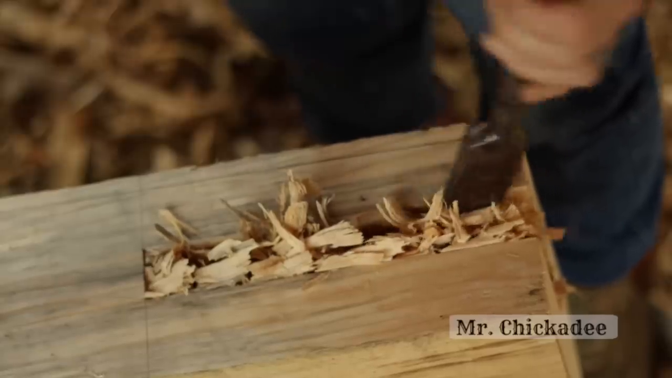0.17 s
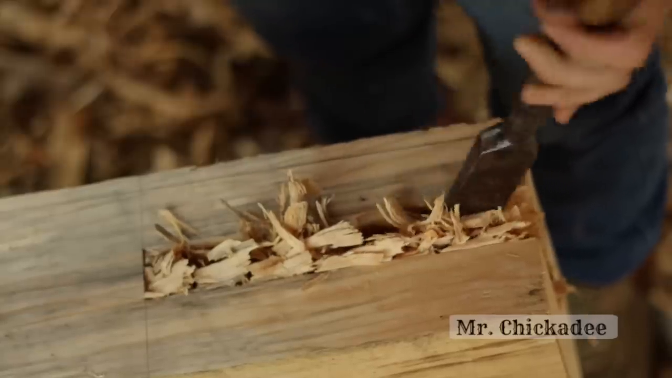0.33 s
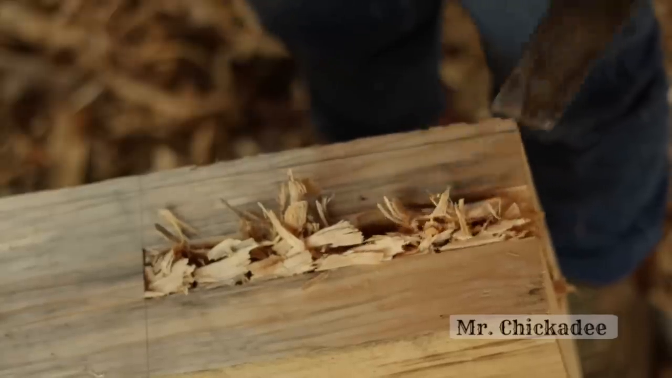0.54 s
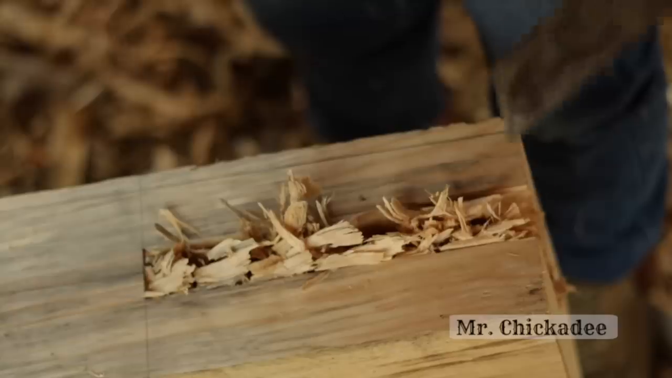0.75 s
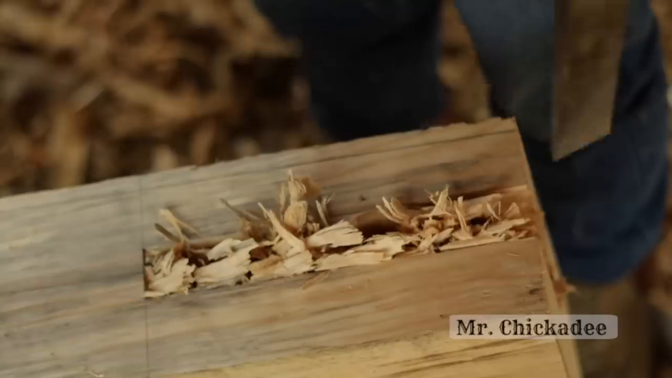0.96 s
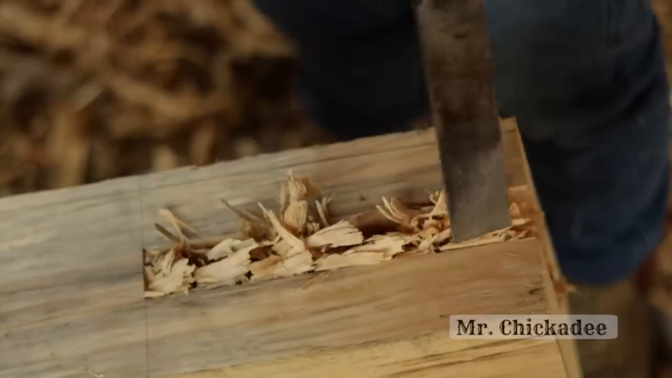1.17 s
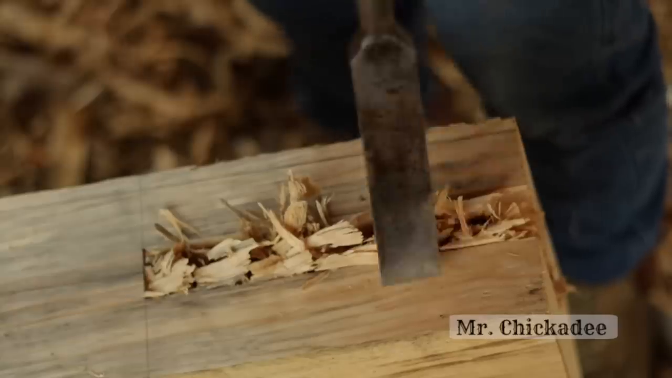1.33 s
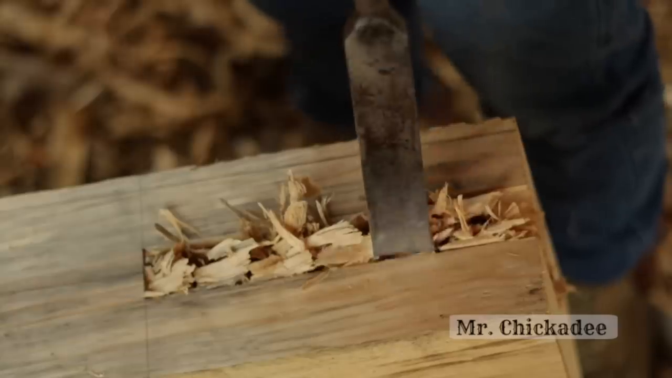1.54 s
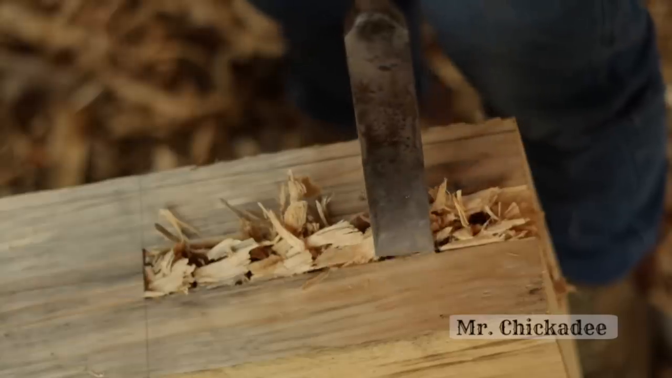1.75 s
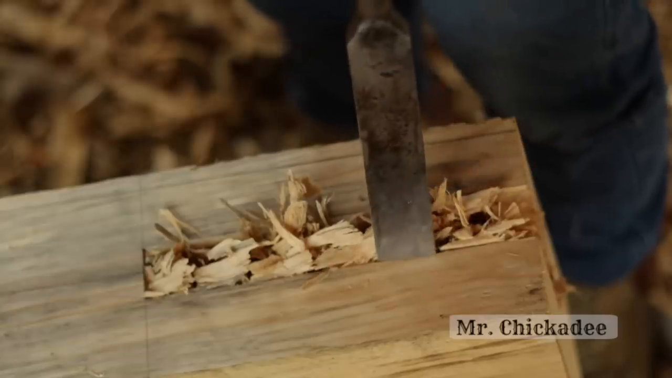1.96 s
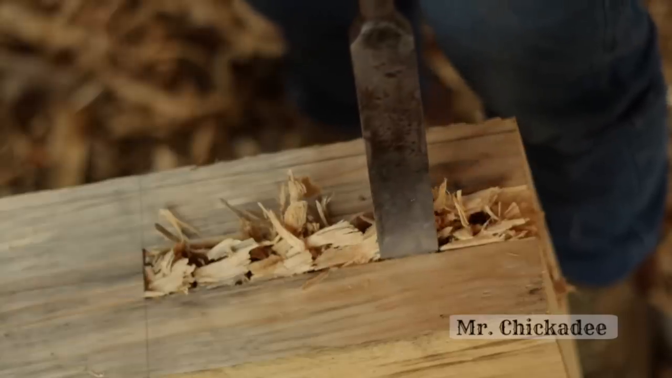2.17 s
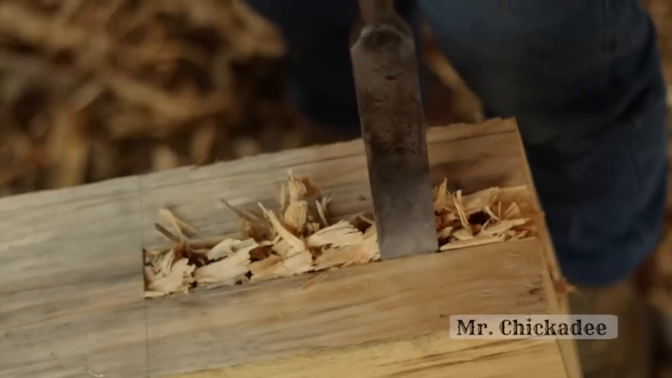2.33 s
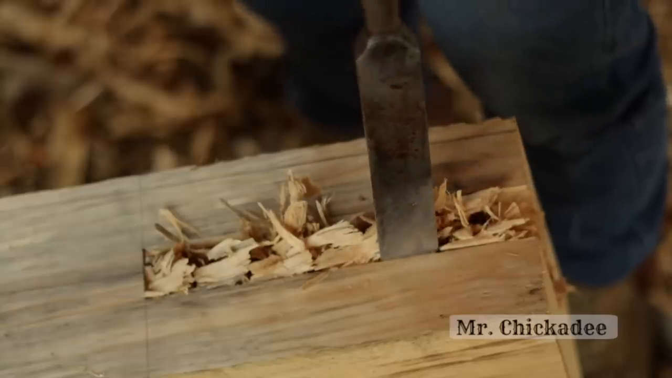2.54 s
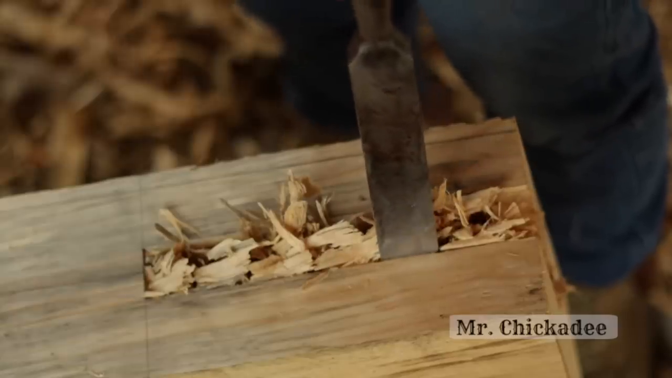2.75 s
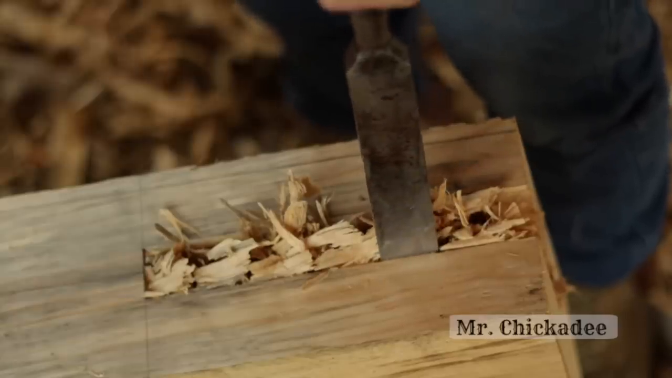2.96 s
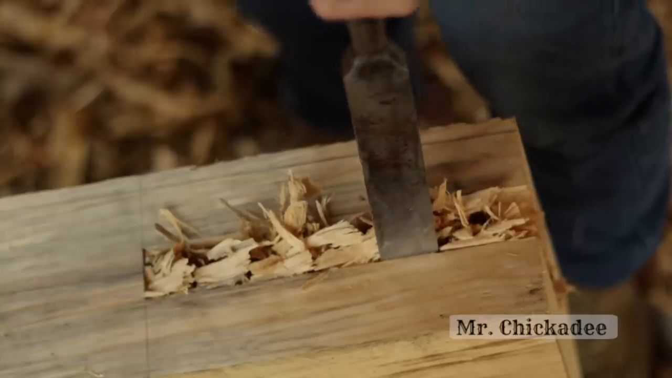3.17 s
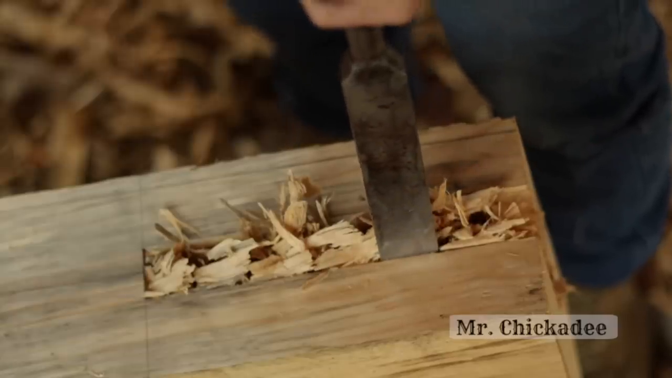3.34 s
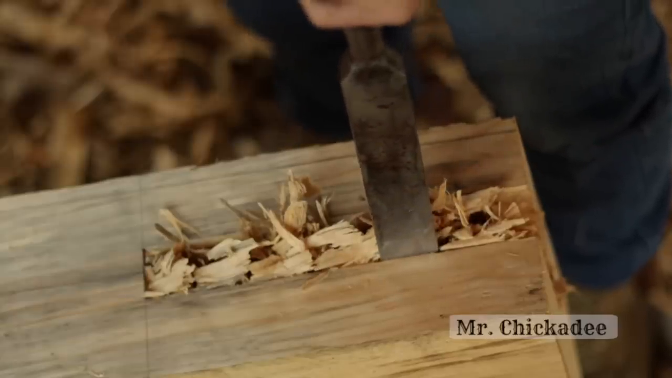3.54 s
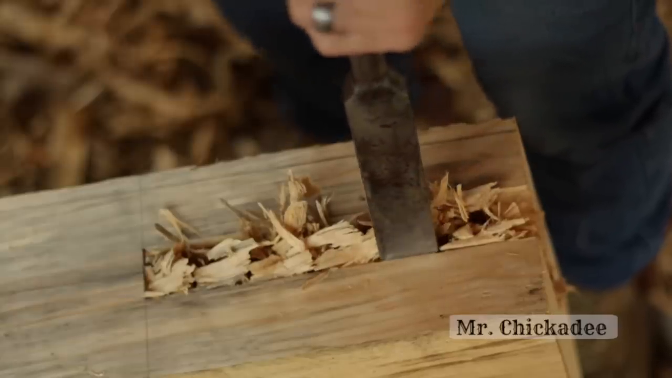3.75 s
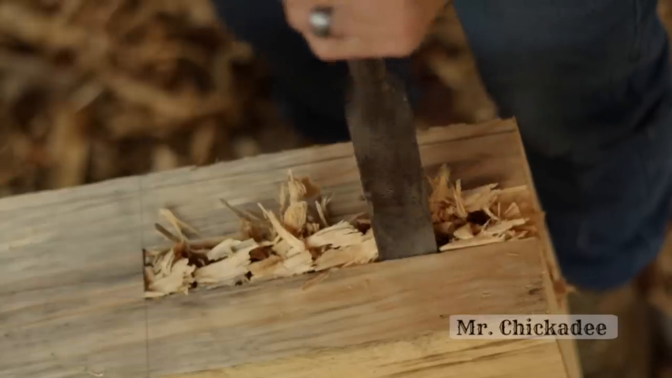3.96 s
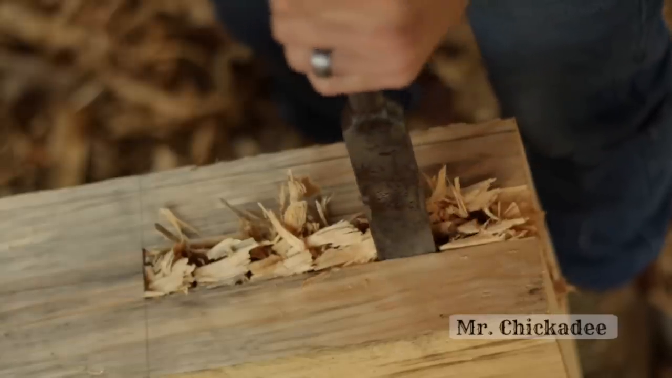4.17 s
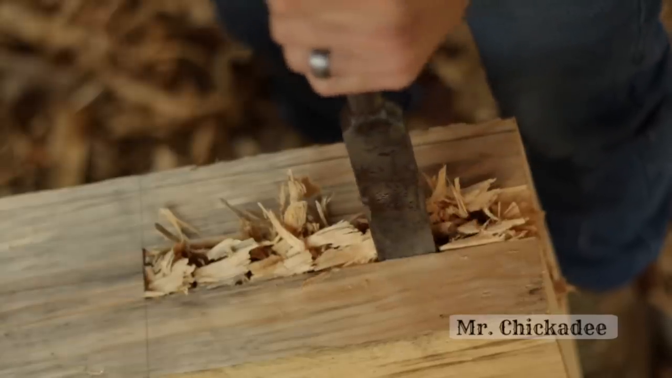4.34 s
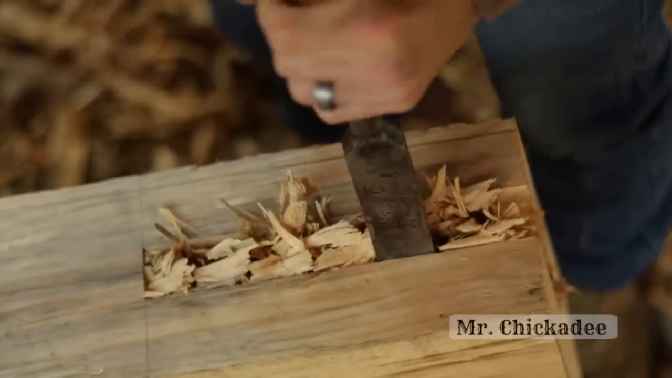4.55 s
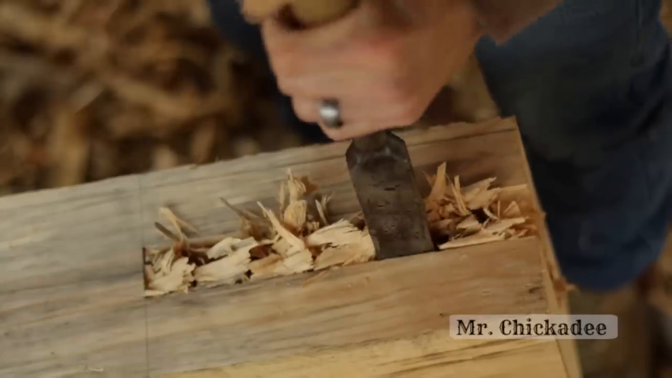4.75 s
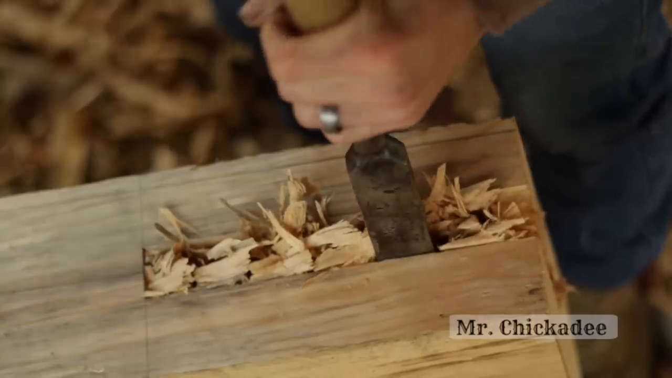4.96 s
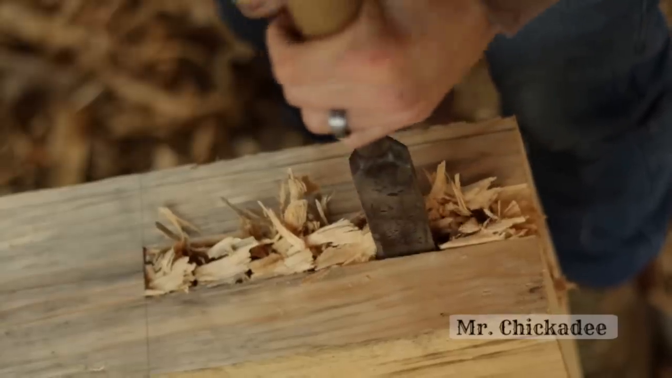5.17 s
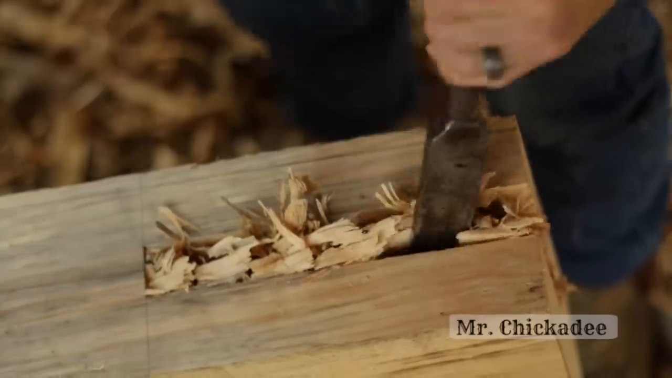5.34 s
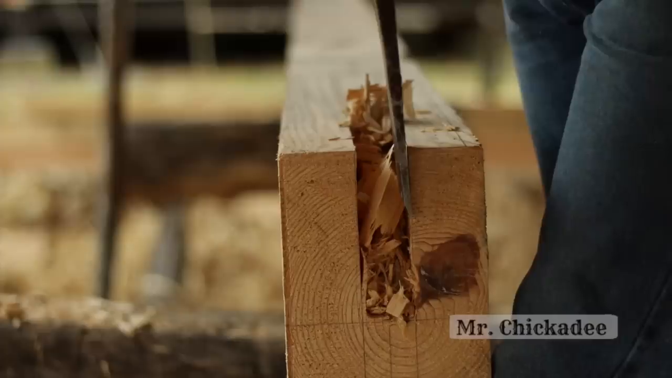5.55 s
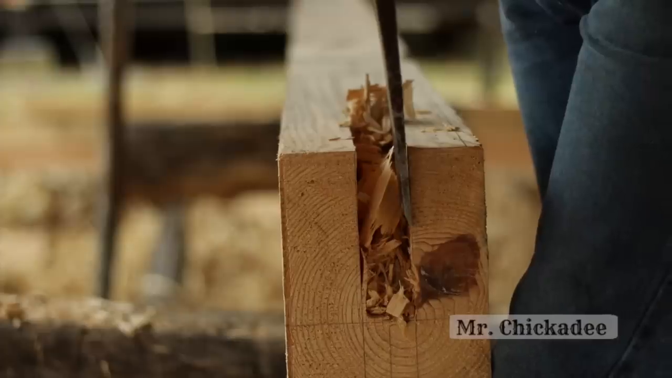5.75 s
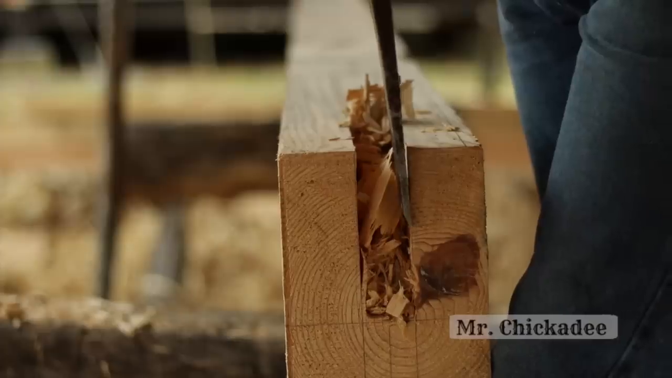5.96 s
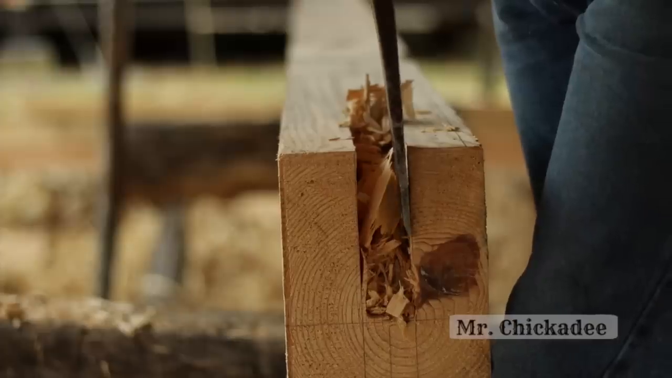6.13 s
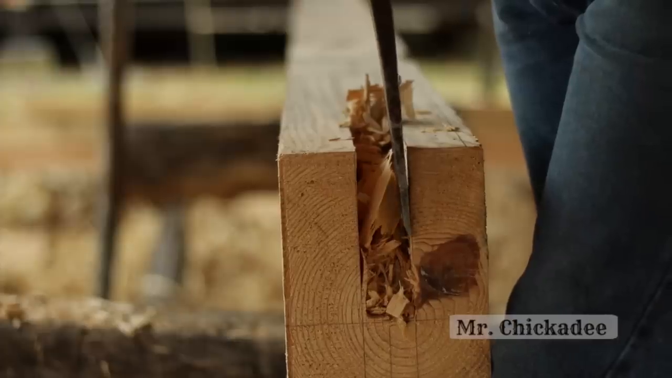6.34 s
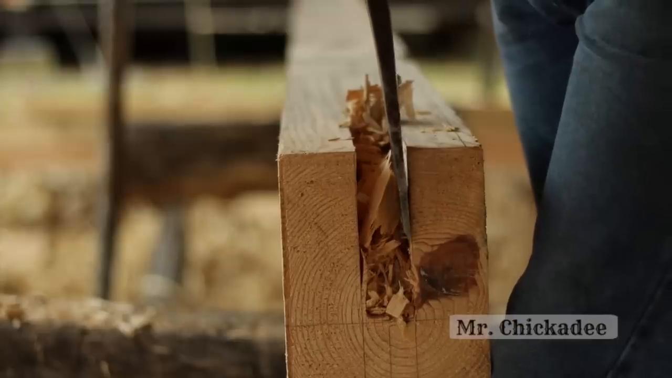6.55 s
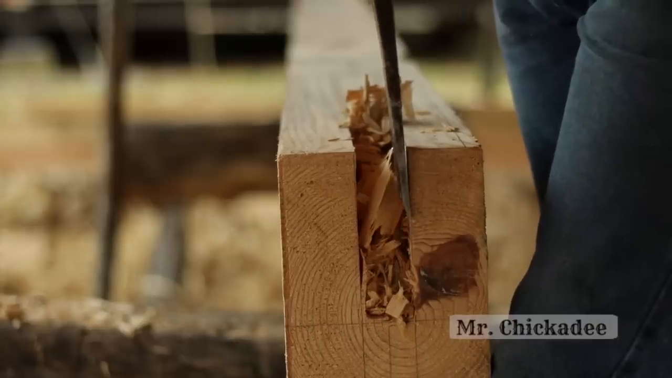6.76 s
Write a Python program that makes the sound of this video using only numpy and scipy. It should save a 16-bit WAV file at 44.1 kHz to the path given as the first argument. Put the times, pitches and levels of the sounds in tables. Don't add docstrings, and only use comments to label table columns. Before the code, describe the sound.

Close stereo pickup above a timber beam. The tail of a blow fades over faint hiss; a blade slides, rustles chips, cracks fibres and rings lightly, then is set down with soft thuds. Five sharp mallet strikes knock and ring the beam, with quick shed echo and a slower yard return. The perspective shifts to the beam's end for three fuller strikes whose echo hangs on along the wood.

```python
import sys
import numpy as np
from scipy import signal
from scipy.io import wavfile
from scipy.ndimage import minimum_filter1d

SR = 44100
rng = np.random.default_rng(int(sys.argv[2]) if len(sys.argv) > 2 else 0)


def int16_out(signal):
    q = np.round(np.clip(np.atleast_2d(signal).T, -1, 1) * 32767)
    wavfile.write(sys.argv[1], SR, q.astype(np.int16))


def undo_db(level):
    steps = np.asarray(level, float) / 20
    return 10 ** steps


N = 299880
CHANGE_S = 5.545
DELAY_S = .0018


def at_hz(points, hz, column=1):
    points = np.array(points)
    return np.interp(np.log(hz), np.log(points[:, 0]), points[:, column])


def clicks(times, sizes):
    out = np.full(N, 1e-18)
    np.add.at(out, ((np.asarray(times) + DELAY_S) * SR).astype(int), sizes)
    return out


def fall(t, t60):
    return undo_db(-60 * t / t60)


def dying(x, t60):
    return signal.lfilter([1], [1, -fall(1 / SR, t60)], x)


def ring(x, hz, t60):
    r, w = fall(1 / SR, t60), 2 * np.pi * hz / SR
    return signal.lfilter([0, np.sin(w)], [1, -2 * r * np.cos(w), r * r], x)


def modes(x, table):
    return sum((-1) ** k * undo_db(db) * ring(x, hz, t60) for k, (hz, db, t60) in enumerate(table))


def band(x, low_hz, high_hz):
    sos = signal.butter(2, [low_hz, min(high_hz, .45 * SR)], "band", fs=SR, output="sos")
    return signal.sosfilt(sos, x)


def noise_bank(alike_table, gain_at):
    out = 0
    edges = 22 * 2 ** np.arange(0, 10, .5)
    white = rng.standard_normal((2, 2, N))
    for k, (low, high) in enumerate(zip(edges, edges[1:])):
        mid, side = band(white[k % 2], low, high)
        hz = np.sqrt(low * high)
        alike = np.clip(at_hz(alike_table, hz), -1, 1)
        stereo = np.sqrt(1 + alike) * mid + np.sqrt(1 - alike) * side * [[1], [-1]]
        out = out + gain_at(hz) * stereo
    return out


def panned(x, pan_db, lag_samples):
    late = np.interp(np.arange(N) - lag_samples, np.arange(N), x)
    return np.array([late, x]) * undo_db(np.array([[.5], [-.5]]) * pan_db)


# (frequency [Hz], density [dB per Hz])
HISS = [(15, -33.5), (80, -3.5), (190, -12), (300, -9), (1100, -13.5), (9580, -24), (15200, -30),
        (16500, -46)]
# (frequency [Hz], left-right likeness [0-1])
HISS_ALIKE = [(60, 1), (240, 0.072), (950, 0.16), (3770, 0.29), (15000, 0.042)]
# (frequency [Hz], rise [dB])
END_AIR = [(60, 7), (300, 5.5), (1000, 2.5), (4000, 4), (14000, 5.5)]


def hiss():
    moved = np.arange(N) >= CHANGE_S * SR
    air = noise_bank(HISS_ALIKE, lambda hz: undo_db(at_hz(HISS, hz) + moved * at_hz(END_AIR, hz)))
    return undo_db(-64.5) * air / air[:, :int(CHANGE_S * SR)].std()


# (time [s], peak [dB], thud [dB], bite [dB], beam ring [dB])
FIRST_BLOW = [
    (-0.0065, 0.74, 3.5, 4, -20),
]
NEAR_BLOWS = [
    (3.6729, -2, 7, -12, -28),
    (4.0304, -0.5, -29, -16.5, -25),
    (4.4058, -1, -28, -23, -31),
    (4.7768, 0.5, -11.5, -12.5, -27.5),
    (5.1397, -1, -21, -17.5, -24),
]
END_BLOWS = [
    (5.7657, -2.5, -13.5, -24, -16),
    (6.1463, 0.5, -16, -5.5, -24.5),
    (6.4863, 1, -23.5, -11, -21),
]
# (frequency [Hz], width [Hz], level [dB])
NEAR_KNOCK = [(410, 150, -8), (816, 89, 5.5), (825, 250, 8.5), (1350, 135, -5), (1656, 67, 2),
              (1760, 270, -4), (2544, 220, 15), (2870, 130, -11), (3940, 84, 2), (4370, 150, 5),
              (6410, 630, 12), (7850, 220, -3)]
END_KNOCK = [(530, 160, -10.5), (780, 200, -35), (1024, 150, 29.5), (1255, 89, 2), (1704, 200, 21),
             (2270, 460, 6.5), (2860, 690, 6), (3040, 160, -0.5), (4240, 130, -1), (6750, 800, 9.5),
             (7650, 200, 6)]
# (frequency [Hz], level [dB], t60 [s])
NEAR_BEAM = [(213.5, -17, 0.28), (266, -16.5, 0.21), (377.6, -5, 0.27), (404, -4, 0.32), (543, -8.5, 0.21),
             (644, -6, 0.073), (732, -5.5, .08), (1027, -19, .06)]
END_BEAM = [(325, -5.5, 0.049), (546, -6.5, 0.1), (667, 1.5, 0.063), (738, -8, 0.17), (870, -8, 0.062),
            (1027, -3.5, 0.043)]
# (frequency [Hz], level [dB], t60 [s])
SEATED_BLADE = [(2870, 3, 0.023), (4680, -3, 0.023)]


def knocking(force, knock, thud_db, bite_db, crack_db):
    colour = [(1100, thud_db + 8.5), (1200, 0.027), (2150, 0.0046),
              (2300, bite_db + 26.5), (3600, bite_db + 1), (3900, crack_db + 18.0)]
    out = 0
    for (hz, width_hz, db), vary_db in zip(knock, rng.normal(0, 2.96, len(knock))):
        t60 = 2.76 / np.clip(0.7 * width_hz, 220, 900)
        out = out + undo_db(db + vary_db + at_hz(colour, hz)) * ring(force, hz, t60)
    return out / np.abs(out).max()


def blows(table, knock, beam, drive_db, edge_db, thump_db, rebound_db, blade_db, sweep_hz,
          shudder_s, crack_s, lag_samples, pan_db):
    out = np.zeros((2, N + SR))
    span = np.arange(SR // 2)
    t = span / SR
    for depth, (s, peak_db, thud_db, bite_db, ring_db) in enumerate(table):
        unseated = depth == 0
        crack_db = edge_db + 0.48 * bite_db
        noise = rng.standard_normal((4, len(span)))
        click = -1. * (span == 0)
        force = 0.39 * noise[0] * fall(t, shudder_s) + click
        body = knocking(force, knock, thud_db, bite_db, crack_db)
        sweep = 2 * np.pi * np.cumsum(1250 + sweep_hz * np.minimum(t / 0.002654, 1)) / SR
        body = body - 1.18 * np.sin(sweep) * fall(t, 0.0079)
        body = band(band(body / np.abs(body).max(), 300, 8000), 300, 8000)
        body += undo_db(rebound_db) * unseated * np.roll(body, int(.023 * SR))
        jostle = noise[1] * fall(t, 0.24)
        body += undo_db(ring_db) * band(modes(click + 0.028 * jostle, beam), 157, 12000)
        body += undo_db(thump_db - 4 * unseated) * fall(t, 0.0047)
        free_modes = SEATED_BLADE[:2 if unseated else 1]
        body += undo_db(blade_db - 1.4 * depth) * modes(noise[0] * fall(t, 0.39), free_modes)
        crack = undo_db(crack_db + 6.0) * band(noise[2:] * fall(t, crack_s), 3830, 8040)
        stereo = body + 1.35 * crack[0] + 0.48 * crack[1] * np.array([[1], [-1]])
        start = int(s * SR)
        out[:, start + span] += undo_db(peak_db + drive_db) * stereo
    left = panned(out[0, :N], pan_db, lag_samples)[0]
    right = panned(out[1, :N], pan_db, 0)[1]
    return np.array([left, right])


NEAR_SHED_DB, END_SHED_DB, FIRST_SHED_DB = 0.8, -0.4, -1.1
NEAR_YARD_DB, END_YARD_DB, FIRST_YARD_DB = -5, -0.2, -5.4


def echo_levels(table, shed_db, yard_db):
    s, peak_db = np.transpose(table)[:2]
    follow_db = 0.62 * peak_db
    return s, undo_db(follow_db + shed_db), undo_db(follow_db + yard_db + 1.03 * np.arange(len(s)))


def echo_trains(s, shed, yard):
    late_s = np.maximum(s + .001, 0)
    return np.array([clicks(late_s, shed ** 2), clicks(late_s, yard ** 2)])


def echo_power(trains, table, hz):
    power = 0
    for train, column in zip(trains, (1, 3)):
        t60 = at_hz(table, hz, column + 1)
        power = power + undo_db(2 * at_hz(table, hz, column)) * dying(train, .5 * t60)
    return power


# (frequency [Hz], early level [dB], early t60 [s], late level [dB], late t60 [s])
NEAR_ECHO = [(100, -65.5, 0.05, -48.5, 0.6), (260, -37.5, 0.53, -51.5, 1.43),
             (697, -20.5, 0.39, -36.5, 1.01), (1440, -20, 0.11, -35, 1.03), (2135, -8, 0.0433, -35, 0.83),
             (2970, -37, 0.09, -42, 0.91), (5540, -26, 0.064, -45.5, 0.64), (13100, -69.5, 0.036, -66, 0.6)]
END_ECHO = [(107, -73, 0.14, -50, 1.7), (258, -29.5, 0.3, -51, 1.3), (620, -17.5, 0.37, -47, 1.17),
            (1490, -23, 0.26, -49, 1.13), (3200, -52.5, 0.58, -60.5, 1.25), (6750, -104, 0.093, -66, 2.3),
            (13700, -77, 0.05, -77.5, 0.4)]
# (frequency [Hz], left-right likeness [0-1])
ECHO_ALIKE = [(100, 1), (1000, 0.41), (8000, 0.13)]


def echoes():
    near_side = np.arange(N) < CHANGE_S * SR
    near_trains = echo_trains(*echo_levels(FIRST_BLOW, FIRST_SHED_DB, FIRST_YARD_DB))
    near_trains = near_trains + echo_trains(*echo_levels(NEAR_BLOWS, NEAR_SHED_DB, NEAR_YARD_DB))
    end_trains = echo_trains(*echo_levels(END_BLOWS, END_SHED_DB, END_YARD_DB))

    def envelope(hz):
        near = echo_power(near_trains, NEAR_ECHO, hz)
        end = echo_power(end_trains, END_ECHO, hz)
        power = signal.lfilter([.012], [1, -.988], near * near_side + end)
        return undo_db(9.5) * np.sqrt(power)
    return noise_bank(ECHO_ALIKE, envelope)


# (frequency [Hz], level [dB], t60 [s])
BLADE_LOW = [(1560, 0.0085, 0.13)]
BLADE_MAIN = [(2718, 3.5, 0.025), (2880, 0, 0.027)]
BLADE_HIGH = [(3190, -4, 0.044), (3960, 2.5, 0.011), (4470, -5.5, 0.06), (4780, -2, 0.036),
              (6460, -13.5, 0.031), (7240, -10.5, 0.034), (8250, -4, 0.039)]
# (frequency [Hz], level [dB], t60 [s])
TAPPED_BEAM = [(131, -5.5, 0.04), (189, -3.5, 0.063), (284, -0.5, 0.081), (391.7, -2.5, 0.4),
               (404.8, -5.5, 0.25), (550, -5, 0.089), (747, -3.5, 0.052), (1120, -5.5, 0.0324)]
# (start [s], length [s], steel rasp [dB], chip rustle [dB], beam rumble [dB])
SLIDES = [(0.154, 0.085, -54, -51.5, -58), (0.217, 0.066, -77, -63, -59.5), (0.342, 0.091, -74, -62, -65),
          (0.446, 0.077, -54, -55, -52.5), (0.534, 0.034, -76, -73, -53.5),
          (0.849, 0.065, -56.5, -56.5, -75), (0.918, 0.034, -43, -79, -79), (1.532, 0.048, -50.5, -59, -52),
          (1.579, 0.033, -43.5, -61, -51.5), (1.612, 0.037, -58, -53, -57), (2.025, 0.034, -68, -78, -58.5),
          (5.421, 0.1, -60, -59.5, -65), (5.505, 0.037, -70, -50.5, -57), (6.724, 0.026, -75, -56, -57.5)]


def slides():
    slips = undo_db(3.45 * np.minimum(rng.exponential(1, (3, N)), 5)) * rng.choice([-1, 1], (3, N))
    slips = slips * (rng.random((3, N)) < 5000 / SR)
    rasp = modes(slips[0], BLADE_MAIN) + 0.29 * modes(slips[0], BLADE_HIGH)
    rasp = rasp + 8 * band(slips[0], 1500, 3900)
    rustle = band(slips[1], 2000, 8600)
    rumble = 0.097 * modes(slips[2], TAPPED_BEAM) + 12 * band(slips[2], 590, 1500)
    layers = [x / x.std() for x in (rasp, rustle, rumble)]
    out, t = np.zeros(N), np.arange(N) / SR
    for start, length, *levels in SLIDES:
        s = start + length * np.array([0, 0.21, 0.72, 1])
        swell_db = np.interp(t, s, [-8, 0, 0, -8])
        fade = np.interp(t, [s[0] - .004, s[0], s[-1], s[-1] + .004], [0, 1, 1, 0])
        out += fade * sum(undo_db(db + swell_db) * x for db, x in zip(levels, layers))
    return panned(out, -0.28, 1.0)


# (time [s], peak [dB], pitch [Hz])
SNAPS = [(0.167, -33.5, 7840), (0.1835, -35, 3560), (0.2116, -27, 3000), (0.2179, -26, 4900),
         (0.2715, -38, 5460), (0.301, -43, 4760), (0.3274, -48, 4550), (0.341, -41, 5380),
         (0.364, -38, 8300), (0.3816, -40.5, 5300), (0.4875, -32.5, 4510), (0.5453, -38, 4010),
         (0.689, -38, 4200), (0.8411, -18, 4000), (1.6272, -26, 8400), (5.3654, -32.5, 4930),
         (5.439, -52, 4590), (5.4618, -37, 5010), (5.4772, -22, 3180), (5.526, -25.5, 3300),
         (6.2274, -29.5, 4120), (6.737, -30.5, 6700)]


def snaps():
    out = np.zeros(N)
    for s, peak_db, pitch_hz in SNAPS:
        burst = rng.standard_normal(300) * fall(np.arange(300) / SR, 0.0029)
        at = int((s + DELAY_S) * SR)
        out[at:at + 300] += undo_db(peak_db + 2.5) * band(burst, .6 * pitch_hz, 2.4 * pitch_hz)
    return panned(out, -1.3, 1.65)


# (time [s], low ring [dB], main ring [dB], high rings [dB], beam thud [dB])
TAPS = [
    (0.462, -53, -57, -62, -36.5),
    (0.546, -73, -74, -68, -32.5),
    (0.636, -47, -43, -63, -48.5),
    (0.795, -71, -60, -65, -81),
    (0.8411, -54, -20, -25, -64),
    (0.936, -56, -39.5, -43, -59),
    (1.501, -59, -41.5, -46, -29.5),
    (1.549, -57, -44, -53, -65),
    (1.932, -69, -49.5, -60, -37),
]


def taps():
    s, low_db, main_db, high_db, thud_db = np.transpose(TAPS)
    steel = modes(clicks(s, undo_db(low_db + 1.5)), BLADE_LOW)
    steel = steel + modes(clicks(s, undo_db(main_db + 1.5)), BLADE_MAIN)
    steel = steel + modes(clicks(s, undo_db(high_db - 1.0)), BLADE_HIGH)
    soft_contact = signal.lfilter([.15], [1, -.85], clicks(s, undo_db(thud_db - 10.0)))
    thud = modes(soft_contact, TAPPED_BEAM)
    return panned(band(steel, 1400, 24000), -7.5, 0.65) + panned(thud, 0.5, 0)


# (frequency [Hz], width [Hz], level [dB])
END_HOLLOW = [(690, 100, -40), (940, 100, -10.5), (1600, 100, -4), (2740, 150, -19.5)]


def hollow():
    hold_s = 0.105
    s, _, yard = echo_levels(END_BLOWS, END_SHED_DB, END_YARD_DB)
    train = clicks(s + 0.0087, yard)
    passed = clicks(s + hold_s, yard * 0.83 * fall(hold_s - 0.014, 0.5))
    envelope = dying(train - passed, 0.63) + undo_db(-19.5) * dying(train, 1.3)
    envelope = signal.lfilter([.01], [1, -.99], envelope)
    noise = rng.standard_normal((2, N))
    fading = (noise[0] + 0.75 * noise[1] * np.array([[1], [-1]])) * envelope
    return sum(undo_db(db - 44.5) * ring(fading, hz, min(2.8 / width_hz, .016))
               for hz, width_hz, db in END_HOLLOW)


def scene():
    first = blows(FIRST_BLOW, NEAR_KNOCK, NEAR_BEAM, drive_db=-2.5, edge_db=-25, thump_db=-10.5,
                  rebound_db=-14, blade_db=-54, sweep_hz=1310, shudder_s=0.015, crack_s=0.019,
                  lag_samples=1.0, pan_db=0.5)
    near = blows(NEAR_BLOWS, NEAR_KNOCK, NEAR_BEAM, drive_db=7.5, edge_db=-7, thump_db=-17,
                 rebound_db=-16, blade_db=-61.5, sweep_hz=1194, shudder_s=0.0058, crack_s=0.0044,
                 lag_samples=0.63, pan_db=1.5)
    end = blows(END_BLOWS, END_KNOCK, END_BEAM, drive_db=2.5, edge_db=-13.5, thump_db=-20.5,
                rebound_db=-33, blade_db=-78, sweep_hz=466, shudder_s=0.017, crack_s=0.0068,
                lag_samples=0.25, pan_db=-2.9)
    struck = (first + near) * (np.arange(N) < CHANGE_S * SR) + end
    return hiss() + struck + echoes() + slides() + snaps() + taps() + hollow()


def gain_control(x, knee_db, most_db, hold_s, release_db_s, attack_s):
    cut = np.clip(20 * np.log10(np.abs(x).max(axis=0) + 1e-9) - knee_db, 0, most_db)
    cut[0] = most_db
    hold = int(hold_s * SR)
    cut = -minimum_filter1d(-cut, hold, origin=(hold - 1) // 2)
    ramp = release_db_s * np.arange(N) / SR
    held = np.maximum.accumulate(cut + ramp) - ramp
    r = np.exp(-1 / (attack_s * SR))
    return x * undo_db(-signal.lfilter([1 - r], [1, -r], held))


def low_pass(x):
    return signal.sosfilt(signal.butter(12, 16860, fs=SR, output="sos"), x)


def record(dry):
    near = gain_control(dry, -13, most_db=13.5, hold_s=0.097, release_db_s=97.0, attack_s=0.0056)
    end = gain_control(dry, -13, most_db=7.5, hold_s=0.11, release_db_s=30.5, attack_s=0.0057)
    is_near = np.arange(N) < CHANGE_S * SR
    x = np.where(is_near, near, end)
    ceiling = np.where(is_near, .37, .55)
    mix = x / (1 + np.abs(x / ceiling) ** 6) ** (1 / 6)
    return low_pass(mix)


dry = scene()
out = record(dry)
int16_out(out)
```